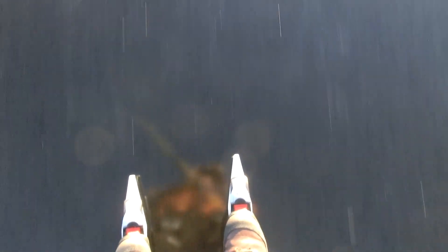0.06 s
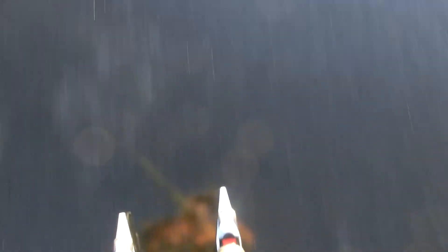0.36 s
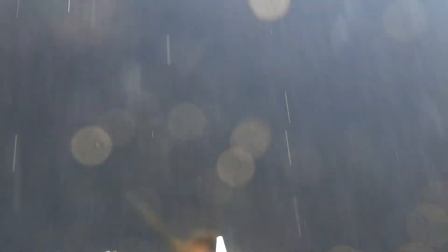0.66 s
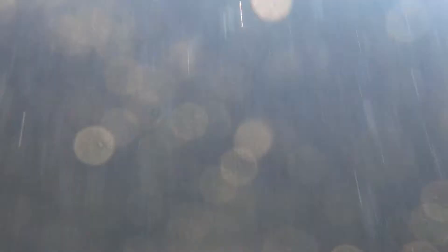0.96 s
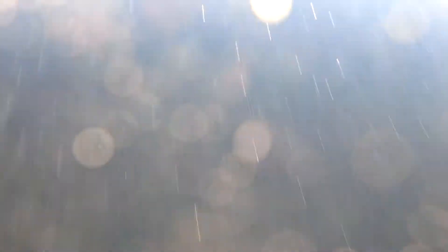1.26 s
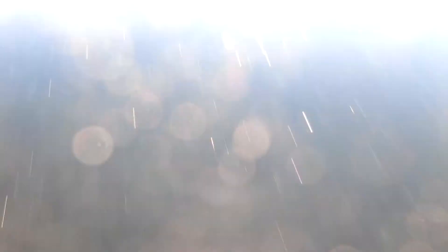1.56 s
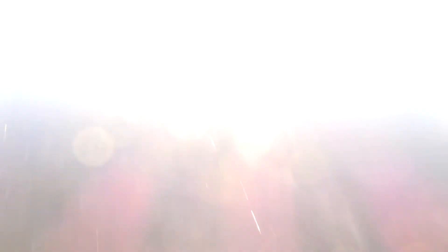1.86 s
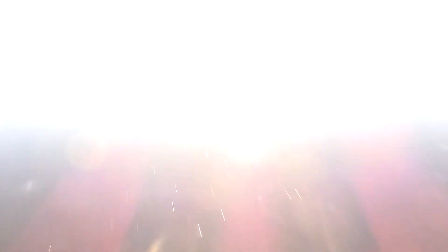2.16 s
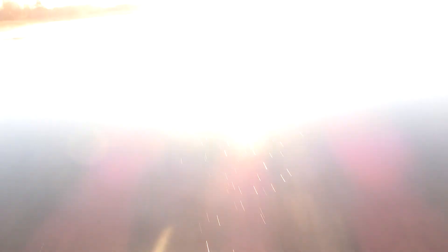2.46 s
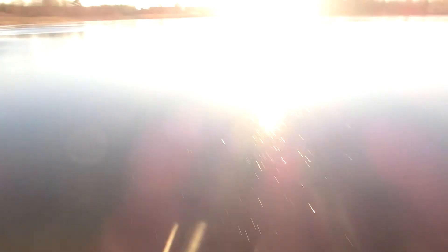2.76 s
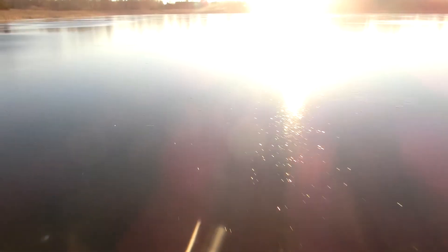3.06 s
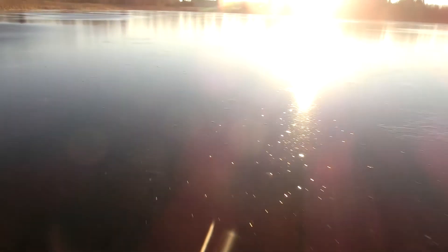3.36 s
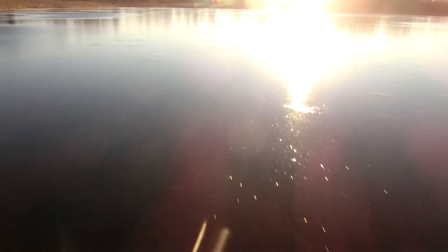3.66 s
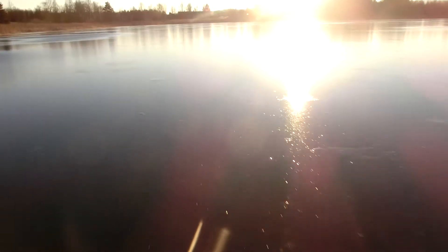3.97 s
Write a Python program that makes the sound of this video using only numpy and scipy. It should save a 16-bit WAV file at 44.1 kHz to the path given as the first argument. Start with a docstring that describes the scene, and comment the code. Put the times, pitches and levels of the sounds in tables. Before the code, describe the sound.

Ice skate blades hiss, scrape and knock, then gusts of wind rumble in.

```python
"""Long skates glide over a frozen lake, heard from a hand-held camera. From the start, blades hiss and
scrape while knocks of skates, poles and handling ring briefly; the hardest, at 0.3 s, overloads the
recorder. From 1.6 s the ice sheet answers with falling chirps, an edge squeaks and, as the camera tilts
up, wind buffets its two microphone ports in turn. From 3 s a loaded blade sings under the gusts."""
import sys
import numpy as np
from scipy import signal
from scipy.fft import rfft, irfft
from scipy.io import wavfile
from scipy.ndimage import uniform_filter1d

SR = 44100
rng = np.random.default_rng(int(sys.argv[2]) if len(sys.argv) > 2 else 0)


def store_wav(level_fs):
    """Save 16-bit WAV to argv[1]."""
    pcm = np.round(np.clip(np.atleast_2d(level_fs), -1, 1) * 32767)
    wavfile.write(sys.argv[1], SR, pcm.T.astype(np.int16))


N = 176400
T = np.arange(N) / SR

# Resonances of the steel blade. Each row: frequency in Hz, relative level in dB, t60 in seconds.
STEEL_MODES = [(3372, 6, 0.013), (4020, 1, 0.02), (4555, 2, 0.023), (5730, 2, 0.012), (6960, -2.5, 0.0079),
               (9320, -4.5, 0.01), (12500, -6, 0.0236)]


def undb(db):
    return 10 ** (np.asarray(db) / 20)


def unit(x):
    """Normalisation to rms 1."""
    return x / np.sqrt(np.mean(x ** 2) + 1e-20)


def curve(rows, column=1):
    """Linear interpolation of one column of a time table."""
    rows = np.array(rows)
    return np.interp(T, rows[:, 0], rows[:, column])


def colour_db(hz, spectrum):
    """Interpolation of a spectrum on a log-frequency axis."""
    points = np.array(spectrum)
    return np.interp(np.log(hz + 1e-9), np.log(points[:, 0]), points[:, 1])


def noise(spectrum, size=N):
    """Spectral shaping: white noise becomes coloured noise of rms 1."""
    gain = undb(colour_db(np.fft.rfftfreq(size, 1 / SR), spectrum))
    return unit(irfft(rfft(rng.standard_normal(size)) * gain, size))


def stereo_noise(spectrum, width, size=N):
    """Decorrelation: the two ports share the bass but differ in the treble."""
    side = signal.sosfilt(signal.butter(4, 3500, "high", fs=SR, output="sos"), noise(spectrum, size))
    return noise(spectrum, size) + width * side * np.array([[1], [-1]])


def drift(rate_hz):
    """Smooth random modulation of rms 1."""
    hold = max(int(SR / rate_hz), 1)
    steps = np.repeat(rng.standard_normal(N // hold + 1), hold)
    return unit(uniform_filter1d(steps, hold)[:N])


def add(out, start_s, x):
    """Superposition of a sound from a given time on."""
    i = max(int(start_s * SR), 0)
    out[:, i:i + x.shape[-1]] += x[..., :max(N - i, 0)]


def ring(force, modes, spread=0, rise_s=0.00016):
    """Modal response: a force drives damped modes, whose pitch scatters with the place of contact."""
    t = T[:min(len(force), 4096)]
    response = 0
    for k, (hz, db, t60) in enumerate(modes):
        tone = np.cos(2 * np.pi * hz * (1 + spread * rng.standard_normal()) * t)
        response += (-1) ** k * undb(db) * tone * np.exp(-np.log(1000) * t / t60)
    return signal.fftconvolve(force, response * np.minimum(t / rise_s, 1))[:len(force)]


def at_level(x, db, window_s=.01):
    """Equivalent level: a transient gets the energy of a steady sound lasting one window."""
    return x * undb(db) / np.sqrt(np.mean(np.sum(x ** 2, axis=-1)) / (window_s * SR))


def eddies(strength_db, reference_db=-23, db_per_octave=15.5):
    """Turbulence at one port: eddies of each size come and go; a buffet is both louder and brighter."""
    # Spectrum at the reference strength. Each row: frequency in Hz, relative density in dB.
    spectrum = [(15, -8), (35, 1), (70, 1.5), (120, 2.5), (180, 3), (250, -3.5), (350, -10.5), (500, -24.5),
                (1400, -63)]
    db = strength_db + 1.5 * drift(60)
    shift = 2 ** (np.clip(db - reference_db, -16, 14) / db_per_octave)
    pressure, power = 0, 0
    for hz in 20 * 2 ** (np.arange(14) / 2):
        half_octave = signal.butter(3, [hz / 2 ** .25, hz * 2 ** .25], "band", fs=SR, output="sos")
        band = signal.sosfilt(half_octave, rng.standard_normal(N))
        gain = undb(colour_db(hz / shift, spectrum)) * np.sqrt(hz)
        pressure += gain * unit(band * undb(3 * drift(30)))
        power += gain ** 2
    return pressure / np.sqrt(power) * undb(db)


def slaps():
    """Suction pulses: a sharp eddy pulls at the port and lets go."""
    # Slaps of air. Each row: centre in seconds, peak in dB, width in seconds.
    pulses = [(2.1147, -3, 0.00054), (2.241, -6, 0.00082), (3.322, -6, 0.00065)]
    pressure = 0
    for centre, db, width in pulses:
        offset = (T - centre) / width
        pressure += undb(db) * (offset ** 2 - 1) * np.exp(-offset ** 2 / 2)
    return pressure


def wind():
    """Turbulent pressure is local: each port has its own eddies, and slaps strike the right one."""
    # Wind strength. Each row: time in seconds, left level in dB, right level in dB.
    gusts = [(0,-61,-62), (1.42,-61.5,-60), (1.65,-47,-49), (1.8,-41,-32.5), (2.0,-31.5,-25.5),
             (2.12,-27,-14), (2.3,-35,-21), (2.45,-24,-22), (2.6,-24,-23), (2.85,-22,-37), (3.1,-26,-26),
             (3.33,-29,-17), (3.45,-21,-21.5), (3.7,-23.5,-26), (3.85,-28.5,-26.5), (4.0,-21.5,-28.5)]
    return np.array([eddies(curve(gusts, column=1)), eddies(curve(gusts, column=2)) + slaps()])


def chips(count, centre_hz=2740, spread_octaves=0.46, decay_cycles=6.4, scatter_db=4):
    """Brittle fracture: chips snap off the ice at random, each ringing briefly at its own pitch."""
    out, t = np.zeros((1, N)), T[:1024]
    starts = rng.uniform(0, T[-1], count)
    for start, pitch, strength in zip(starts, rng.standard_normal(count), rng.exponential(size=count)):
        cycles = min(centre_hz * 2 ** (spread_octaves * pitch), 15900) * t
        ping = np.sin(2 * np.pi * cycles) * np.exp(-cycles / decay_cycles)
        add(out, start, undb(scatter_db * min(strength, 4)) * ping)
    return unit(out[0])


def glide():
    """Sliding friction: blades crunch over small bumps in the ice, under a thin high hiss."""
    # Loudness of the blades and of the hiss. Each row: time in seconds, level in dB.
    glide_levels = [(0, -50.5), (.3, -50), (.7, -57), (1.3, -54.5), (1.62, -47), (2.1, -44), (2.35, -40),
                    (2.52, -45.5), (2.82, -47.5), (3.0, -42), (3.4, -42.5), (3.85, -47.5)]
    hiss_levels = [(0, -44.5), (.17, -41.5), (.35, -48.5), (.6, -52), (1.42, -52.5), (1.56, -54.5),
                   (3.4, -51), (4, -53.5)]
    # Their spectra. Each row: frequency in Hz, relative density in dB.
    glide_spectrum = [(60, -12), (180, 11.5), (500, 2.5), (1400, -2), (3600, -9), (6300, -13.5),
                      (16000, -35)]
    hiss_spectrum = [(1000, 3), (3800, -11), (5000, 2.5), (6000, -1), (8200, 1), (9500, 5.5), (12500, 1.5),
                     (15500, -8)]
    roughness = unit(undb(2 * drift(32) + 2.2 * drift(300)))
    running = stereo_noise(glide_spectrum, width=0.12) + undb(-9) * chips(count=1000)
    hiss = stereo_noise(hiss_spectrum, width=0.51) * undb(curve(hiss_levels) + drift(39.72))
    return undb(curve(glide_levels)) * roughness * running + hiss


def singing():
    """Forced resonance: fine grit keeps a blade ringing while it carries the weight."""
    # Modes of the loaded blade. Each row: frequency in Hz, relative level in dB, t60 in seconds.
    modes = [(2050, 1, 0.013), (2480, 1.5, 0.011), (3070, 5.5, 0.005), (5130, 8, 0.0029), (9300, -3, 0.006)]
    # Loudness of the ringing. Each row: time in seconds, level in dB.
    levels = [(0, -52), (.6, -65.5), (2.5, -67), (3.0, -45), (3.2, -51.5), (3.55, -45.5), (3.9, -50.5)]
    grit = rng.standard_normal(N) * undb(3.5 * drift(400) + 1.2 * drift(30))
    return unit(ring(grit, modes)) * undb(curve(levels))


def ice_chirps(top_hz=901, spread_s=0.0032, fall=0.27, rise_s=0.018, size=8192):
    """Dispersion of bending waves in the ice: the highs arrive first; many paths blur the tone."""
    # Chirps of the sheet. Each row: start in seconds, peak in dB, decay time in seconds.
    chirps = [(1.571, -35.5, 0.019), (1.752, -37, 0.021), (1.961, -33.5, 0.0099), (2.305, -24.5, 0.018),
              (2.364, -34.5, 0.027)]
    out, t = np.zeros((2, N)), T[:size]
    hz = top_hz * (1 + t / spread_s) ** -fall
    phase = 2 * np.pi * np.cumsum(hz) / SR
    for start, db, decay in chirps:
        swell = np.minimum(t / rise_s, 1) * np.exp(-np.maximum(t - rise_s, 0) / decay)
        flutter_db, blur = 2 * drift(240)[:size], drift(240)[:size] / 3
        add(out, start, undb(db + flutter_db) * swell * np.sin(phase + blur))
    return out


def squeak(start_s=1.696, length_s=.046, from_hz=680, to_hz=1120):
    """Frictional vibration: an edge taking load gives a short tone that rises as it fades."""
    progress = np.clip((T - start_s) / length_s, 0, 1)
    hz = (from_hz + (to_hz - from_hz) * np.sqrt(progress)) * (1 + 0.0533 * drift(200))
    envelope = np.minimum(progress * 20, 1) * (1 - progress) ** .5
    return undb(-35 + 2 * drift(120)) * envelope * np.sin(2 * np.pi * np.cumsum(hz) / SR)


def scrapes(attack_s=0.0034, release_s=0.0039):
    """Abrasion: a biting edge crunches off chips, throws a spray of ice and sets the steel ringing."""
    # Bites of the edge. Each row: start and length in seconds, crunch and spray levels in dB,
    # swell over the length in dB.
    bites = [(0.113,0.028,-39,-41.5,10.5), (1.708,0.042,-36,-40,-13), (1.882,0.064,-44.5,-45,1),
             (2.595,0.062,-38,-42,-11.5), (2.652,0.013,-37,-30,5), (2.661,0.005,-24,-21,1),
             (2.873,0.077,-37,-38,-17.5), (2.971,0.023,-34,-41.5,-11), (3.359,0.044,-40,-43,-6),
             (3.435,0.018,-38.5,-46,33), (3.964,0.042,-28,-46.5,-1)]
    # Spectra of crunch and spray. Each row: frequency in Hz, relative density in dB.
    crunch_spectrum = [(200, -38), (600, -7), (1000, 2.5), (1350, -2), (2050, 0), (2800, -5), (4000, -27),
                       (9000, -57)]
    spray_spectrum = [(1200, -31), (2500, -2.5), (3600, -0.5), (5300, 0), (8500, -2.5), (11000, -1),
                      (14500, -11)]
    crunch_level, spray_level = 0, 0
    grit = unit(undb(3.5 * drift(450)))
    for start, length, crunch_db, spray_db, swell_db in bites:
        age = T - start
        bite = np.clip(age / attack_s, 0, 1) * np.exp(-np.maximum(age - length, 0) / release_s)
        bite *= undb(swell_db * (np.clip(age / length, 0, 1) - .5))
        crunch_level += bite * undb(crunch_db)
        spray_level += bite * undb(spray_db)
    steel = undb(-3) * unit(ring(rng.standard_normal(N), STEEL_MODES))
    crunch = unit(noise(crunch_spectrum) + undb(-6) * chips(count=2400))
    spray = stereo_noise(spray_spectrum, width=0.54)
    return grit * (crunch_level * crunch + spray_level * spray) + spray_level * steel


def knocks(attack_s=0.0014, size=4096):
    """Impact excitation: a tap, then chatter that grows with contact time, rings modes as ice cracks."""
    # Blows. Each row: start in seconds, thud level in dB, thud tilt in dB per octave,
    # clack and crack levels in dB, decay time of the contact in seconds.
    blows = [(0.1451,-26.5,-1,-37.5,-28.5,0.0041), (0.2402,-27.5,-1.5,-45,-34.5,0.0037),
             (0.2593,-30,1,-32.5,-26.5,0.0057), (0.2621,-30,1,-35,-31.5,0.0016),
             (0.3181,-24,2.5,-8.5,-15.5,0.0016), (0.321,-24,2.5,-28,-21.5,0.0051),
             (0.3477,-39,8,-37.5,-44,0.0021), (0.477,-44,-0.5,-46,-39.5,0.0033),
             (0.5198,-28.5,6,-27,-30.5,0.0035), (0.976,-44.5,-2.5,-46,-46.5,0.0061),
             (1.007,-40,-3.5,-50,-66,0.0035), (1.0483,-29,1.5,-34.5,-41.5,0.0032),
             (1.146,-32,-1.5,-39.5,-38,0.0082), (1.667,-33.5,-3.5,-48,-52,0.0014),
             (1.6902,-25.5,10.5,-34,-31.5,0.0015), (1.6924,-24,5.5,-24.5,-30.5,0.0048),
             (1.9332,-34,2,-26,-33,0.0054), (2.0891,-36,5,-39.5,-53,0.0053),
             (2.284,-32.5,5,-29.5,-34,0.0089), (2.3051,-25.5,-0.5,-26,-29,0.0076),
             (2.43,-31.5,1,-38,-66,0.0057), (2.581,-39,6,-40,-42,0.0086), (2.809,-55,-5,-54,-37,0.0027),
             (2.875,-39,0,-27.5,-42,0.011), (3.293,-53,0,-29.5,-37.5,0.0047), (3.45,-31,-1,-26,-32,0.0042),
             (3.792,-31.5,11,-35.5,-42.5,0.0034), (3.853,-35,17,-31.5,-37,0.0058)]
    # Low and high resonances. Each row: frequency in Hz, relative level in dB, t60 in seconds.
    thud_modes = [(177, -7.5, 0.04), (298, -3.5, 0.016), (499, -0.5, 0.012), (642, -0.5, 0.012),
                  (854, -1, 0.0069)]
    clack_modes = [(1070, -5, 0.0062), (1610, 1.5, 0.0097), (1820, 4, 0.0082), (2187, 1, 0.0075),
                   (2600, -2, 0.005)]
    # Spectrum of crushed ice. Each row: frequency in Hz, relative density in dB.
    crack_spectrum = [(300, 10), (1500, -22), (2800, -5), (4500, 4), (6500, -1.5), (8700, 2), (12500, -4),
                      (15500, -15)]
    out, t = np.zeros((2, N)), T[:size]
    low_cut = signal.butter(2, 130, "high", fs=SR, output="sos")
    tap = 1. * (t == 0)
    for start, thud_db, tilt, clack_db, crack_db, contact_s in blows:
        contact = (1 - np.exp(-t / attack_s)) * np.exp(-t / contact_s)
        chatter = contact * rng.standard_normal(size)
        tilted_modes = [(hz, db + tilt * np.log2(hz), t60) for hz, db, t60 in thud_modes]
        body = ring(tap + 0.14 * chatter, tilted_modes, spread=.02)
        thud = at_level(signal.sosfilt(low_cut, body), thud_db)
        clack = at_level(ring(tap + 14 * contact_s * chatter, clack_modes, spread=.02), clack_db)
        crack = at_level(contact * stereo_noise(crack_spectrum, width=0.35, size=size), crack_db)
        steel = at_level(ring(chatter, STEEL_MODES), crack_db - 11)
        add(out, start, thud + clack + crack + steel)
    return out


def scene():
    """Superposition: separate wind on each port, skates and ice in the middle."""
    return wind() + knocks() + scrapes() + squeak() + ice_chirps() + glide() + singing()


def record(dry):
    """Saturation and band limiting: the recorder clips at full scale, then cuts the top."""
    low_pass = signal.ellip(8, .2, 70, 15900, fs=SR, output="sos")
    return signal.sosfilt(low_pass, np.clip(dry, -1, 1))


dry = scene()
out = record(dry)
store_wav(out)
```